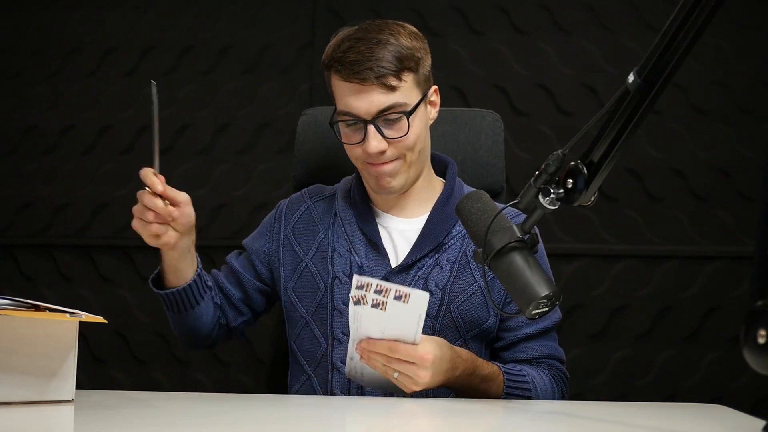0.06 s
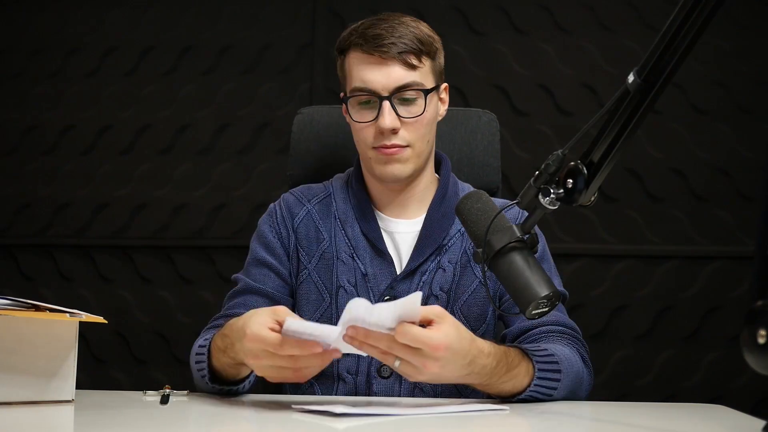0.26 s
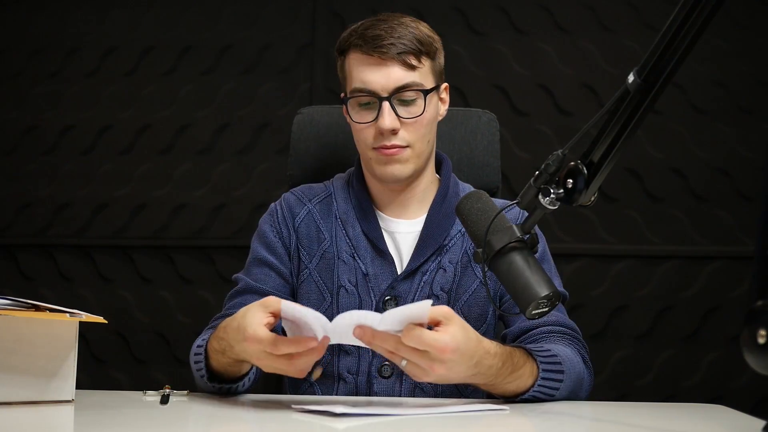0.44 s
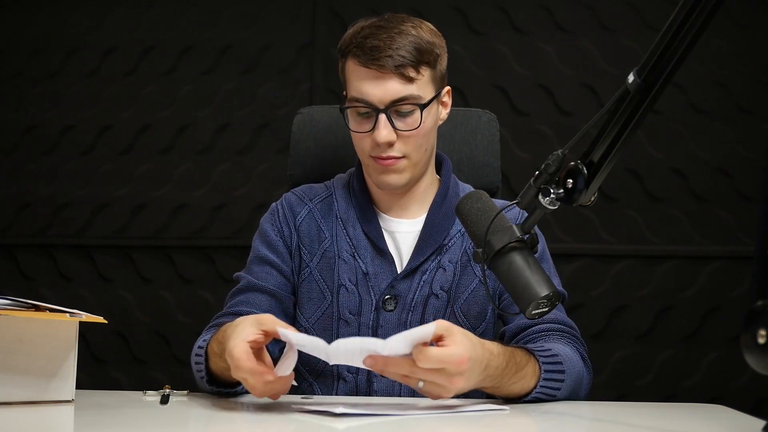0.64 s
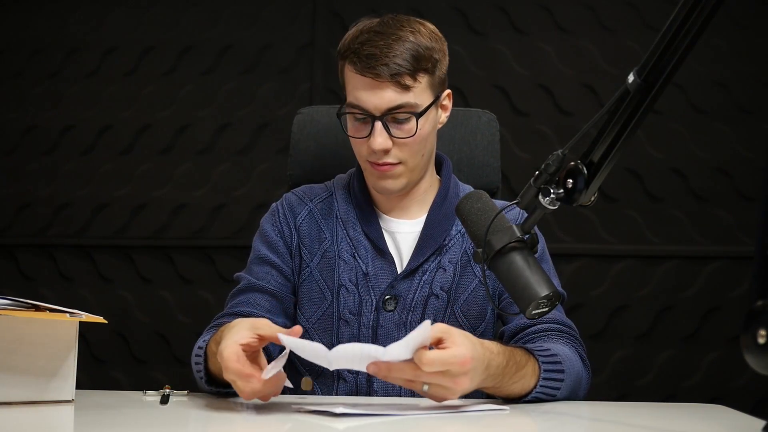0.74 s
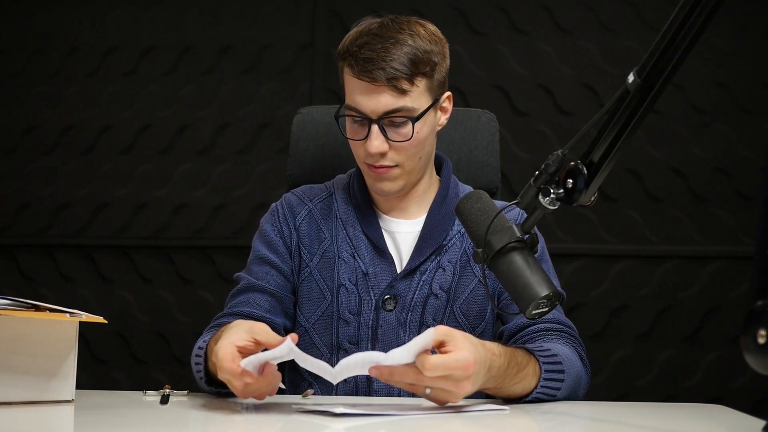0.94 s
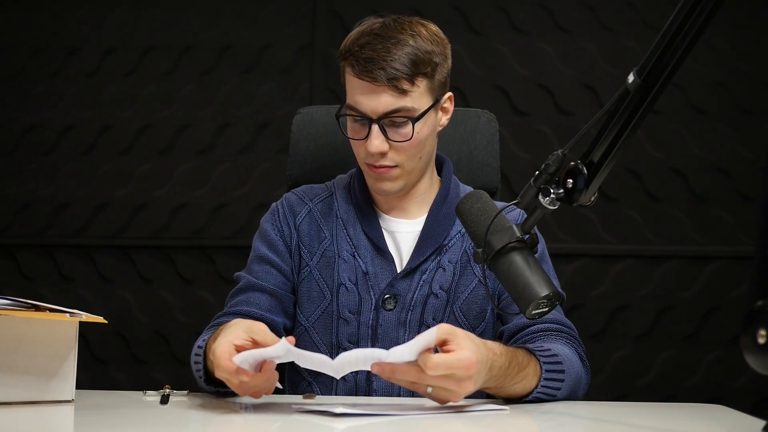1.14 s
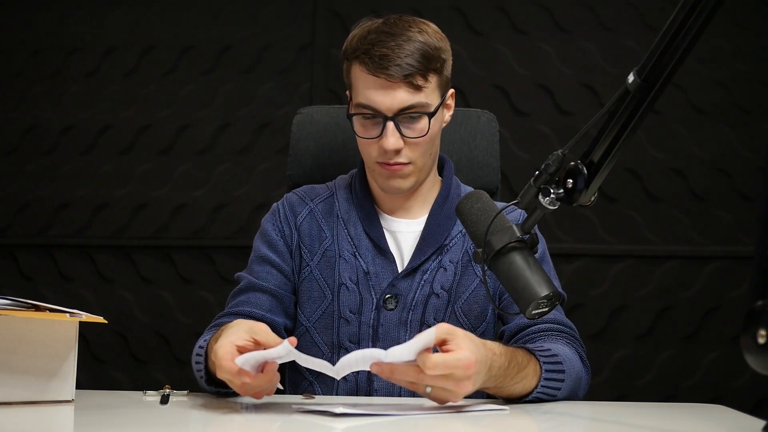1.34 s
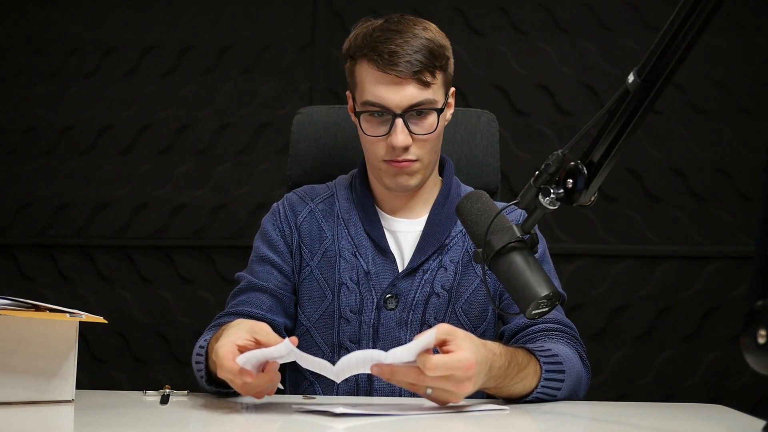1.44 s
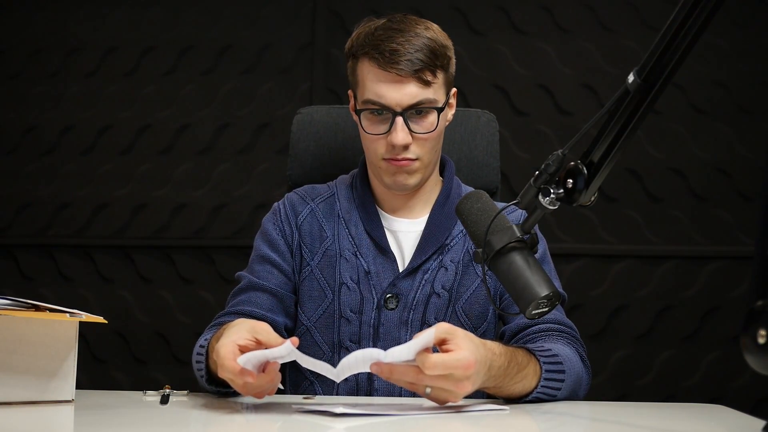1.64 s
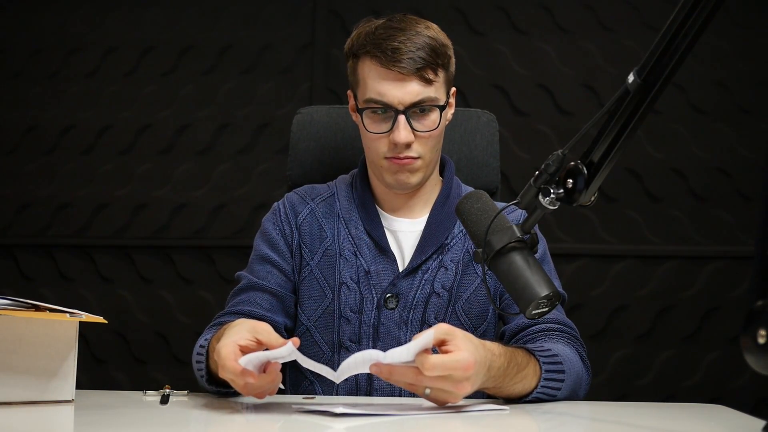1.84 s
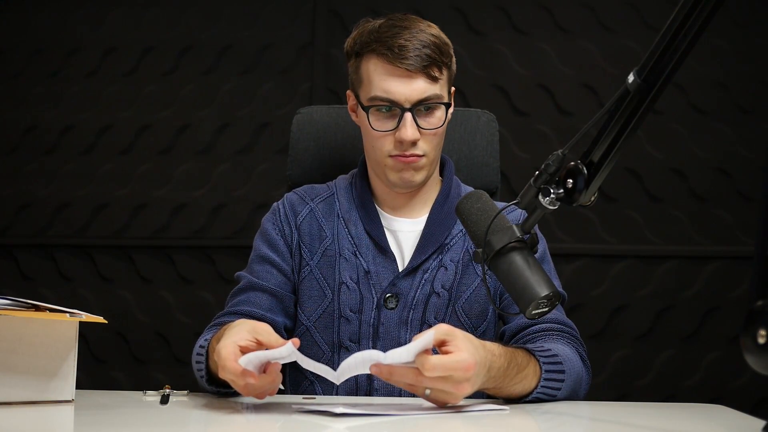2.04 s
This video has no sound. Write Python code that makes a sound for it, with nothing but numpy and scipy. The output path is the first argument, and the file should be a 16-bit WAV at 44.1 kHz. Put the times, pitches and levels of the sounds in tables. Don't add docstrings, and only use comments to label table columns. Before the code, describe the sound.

A small coin drops onto a hard desk. A knock dies away at the start over faint room air; low thumps, soft paper rustle and dull taps follow, strongest near 0.45 s. The coin hits at 0.57 s, bouncing with sharp ticks and thin high ringing until 1.0 s, rattles, then rolls quietly on its rim, wobbling faster to the end at about 2.1 s. Close microphone, small damped room.

```python
import sys
import numpy as np
from scipy import signal
from scipy.fft import rfft, irfft
from scipy.io import wavfile

SR = 44100
rng = np.random.default_rng(int(sys.argv[2]) if len(sys.argv) > 2 else 0)


def generate_wav(sig):
    pcm = np.round(np.clip(np.atleast_2d(sig).T, -1, 1) * 32767).astype(np.int16)
    wavfile.write(sys.argv[1], SR, pcm)


def level_to_linear(level):
    exponent = np.asarray(level, float) / 20
    return 10 ** exponent


N = 92080


def level(x, db):
    return x * level_to_linear(db) / np.sqrt(np.mean(x ** 2))


def band(x, hz, width_hz):
    return signal.lfilter(*signal.iirpeak(min(hz, .45 * SR), hz / width_hz, fs=SR), x)


def low(x, hz):
    return signal.lfilter(*signal.butter(2, min(hz, .45 * SR), fs=SR), x)


def colour(points):
    hz, db = np.array(points).T
    f = np.fft.rfftfreq(N, 1 / SR) + 1
    gain = level_to_linear(np.interp(np.log(f), np.log(hz), db))
    return level(irfft(rfft(rng.standard_normal(N)) * gain, N), 0)


def spikes(times, sizes):
    x = np.zeros(N)
    np.add.at(x, np.clip((np.asarray(times) * SR).astype(int), 0, N - 1), sizes)
    return x


def through(x, response):
    return signal.fftconvolve(x, response)[:N]


def burst(hz, width_hz, t60, grit=0.27):
    u = np.arange(400) / SR
    x = grit * rng.standard_normal(400) * level_to_linear(-60 * u / t60)
    x[0] = -2
    x = low(band(x, hz, width_hz), hz + width_hz)
    return x / np.abs(x).max()


# f/Hz, level/dB, t60/s
ROOM_BANDS = [(250, -12.5, 0.23), (470, -8, 0.17), (1120, -4.5, 0.19), (1710, 0.5, 0.2), (4000, 3.5, 0.13),
              (7100, -25, 0.043), (11000, -24, 0.11), (15500, -15, 0.13)]
# f/Hz, width/Hz, level/dB
DESK_MODES = [(540, 60, -9), (830, 60, -19), (1140, 95, -1), (1440, 80, -3), (1710, 80, -5),
              (1930, 100, -1), (2420, 100, -4), (2950, 110, -6), (6500, 300, -5)]


def room():
    DESK_DB, DESK_T60_S, RISE_S = -8, 0.25, 0.00033
    t = np.arange(SR // 2) / SR
    out = np.zeros(len(t))
    for hz, db, t60 in ROOM_BANDS:
        noise = band(band(rng.standard_normal(len(t)), hz, 1.01 * hz), hz, 1.12 * hz)
        out += level_to_linear(db - 60 * t / t60) * level(noise, 0)
    desk, noise = np.zeros(len(t)), rng.standard_normal(len(t))
    for hz, width, db in DESK_MODES:
        mode = 2 * np.sin(2 * np.pi * hz * t) * np.exp(-t * width / 2)
        desk += level_to_linear(db) * (level(band(noise, hz, width), 0) + mode)
    out = (out + level_to_linear(DESK_DB - 60 * t / DESK_T60_S) * desk) * (1 - np.exp(-t / RISE_S))
    return out / np.sqrt(np.sum(out ** 2))


# f/Hz, level/dB per Hz
AIR_SPECTRUM = [(15, -7.5), (28, -9), (70, -23.5), (120, -15), (200, -28), (500, -27.5), (1500, -33.5),
                (16000, -54)]


def air():
    return level_to_linear(-66.5) * colour(AIR_SPECTRUM)


def knock(t):
    LEVEL_DB, TOP_HZ, T60_S = -35, 1600, 0.16
    dull = low(rng.standard_normal(N), TOP_HZ)
    bright = low(rng.standard_normal(N), 6700)
    return level_to_linear(LEVEL_DB - 60 * t / T60_S) * level(dull + 0.55 * bright, 0)


# t/s, level/dB, f/Hz, t60/s
THUMP_SWINGS = [(0, -27.5, 53.5, 0.07), (.002, -44, 139.3, 0.12), (.275, -45, 39.4, 0.23),
                (0.346, -51.5, 62, 0.29), (0.446, -36.5, 103, 0.072), (.49, -49.5, 45.4, 0.31),
                (0.596, -41.5, 45, 0.29), (0.758, -37.5, 47.2, 0.24), (0.766, -59.5, 120.4, 0.6),
                (0.895, -47, 47.8, 0.23), (0.98, -52, 46, 0.2), (1.11, -57.5, 47.7, .2),
                (1.141, -71.5, 122.3, 0.97)]


def thumps(t):
    out = np.zeros(N)
    for s, db, hz, t60 in THUMP_SWINGS:
        u = np.clip(t - s, 0, None)
        rise = 1 - np.exp(-u * hz)
        out -= level_to_linear(db - 60 * u / t60) * rise * 2 * np.sin(2 * np.pi * hz * u)
    return out


# t/s, level/dB, f/Hz, t60/s
PANEL_MODES = [(0, -38, 446, .11), (0, -37, 1093, 0.07), (0, -33, 1297, 0.042), (0, -57, 1030, 0.069),
               (.171, -53, 462, 0.092), (0.236, -44.5, 1040, 0.031), (.237, -53, 330, 0.033),
               (.2762, -46, 818, 0.13), (0.2754, -41.5, 1140, .12), (0.2775, -43.5, 1284, 0.15),
               (0.277, -48, 1385, 0.16), (.445, -37, 407, .06), (.853, -39, 1000, 0.084),
               (.19, -54.5, 1060, 0.027), (.237, -45.5, 2210, 0.015), (.237, -40, 4620, 0.013),
               (.341, -53, 2530, 0.032), (.445, -37.5, 841, 0.19), (0.443, -35.5, 1152, 0.15),
               (.445, -33, 1477, 0.083), (0.444, -55, 1960, 0.064), (.5756, -53, 580, 0.12),
               (.5756, -36, 1867, 0.11), (0.5754, -45, 1192, 0.099), (0.7437, -30, 1146, 0.071),
               (0.744, -46.5, 1510, 0.13), (.7436, -39, 2430, 0.14), (0.8866, -39, 1080, 0.1),
               (0.8866, -49, 2040, 0.095)]


def panel_modes(t):
    RISE_S, ROUGH_DB, ROUGH_HZ = 0.00067, 3, 107
    out = np.zeros(N)
    for s, db, hz, t60 in PANEL_MODES:
        u = np.clip(t - s, 0, None)
        rough = ROUGH_DB * level(low(rng.standard_normal(N), ROUGH_HZ), 0)
        out -= level_to_linear(db + rough - 60 * u / t60) * (1 - np.exp(-u / RISE_S)) * np.sin(2 * np.pi * hz * u)
    return out


# t/s, level/dB
RUSTLE_LEVEL = [
    (.13, -82),
    (.17, -69),
    (.22, -68.5),
    (.3, -60.5),
    (.4, -56.5),
    (0.429, -51),
    (.5, -56),
    (.56, -67.5),
    (.75, -85),
]


def rustle(t):
    grain = level_to_linear(2.9 * level(low(rng.standard_normal(N), 79), 0))
    paper = level(grain * band(rng.standard_normal(N), 840, 5000), 0)
    return low(paper * level_to_linear(np.interp(t, *np.array(RUSTLE_LEVEL).T, left=-120, right=-120)), 8000)


# t/s, level/dB, f/Hz, body level/dB
PAPER_TAPS = [(0.171, -45.5, 457, -4), (.237, -36.5, 2410, -17), (0.2435, -60, 2520, 5),
              (0.276, -31, 1100, -4.5), (0.282, -35.5, 1190, -28), (0.2906, -42.5, 1210, -12),
              (0.322, -46.5, 4900, -11), (0.3426, -48, 2370, -4), (0.422, -37, 4000, -7),
              (0.4394, -37, 825, -2), (0.443, -33, 3840, -12), (0.4451, -22, 1600, -7),
              (0.4489, -23.5, 4000, -4.5), (0.4521, -26, 3600, -8), (0.454, -24, 1150, -11.5),
              (0.4627, -39, 3070, -16), (0.473, -36, 5100, 7), (0.4966, -44, 1160, 9)]


def taps(answer):
    T60_S, ROOM_DB, ROOM_TOP_HZ = 0.0092, 13, 4230
    out = np.zeros(N)
    for s, db, hz, body_db in PAPER_TAPS:
        kick = spikes([s], [level_to_linear(db)])
        snap = burst(hz, 0.79 * hz, T60_S, grit=0.33) + 0.59 * burst(3640, 4100, 0.017, grit=0.36)
        body = low(answer, ROOM_TOP_HZ) + band(answer, hz, hz / 2)
        out += through(kick, snap) + level_to_linear(ROOM_DB + body_db) * through(kick, body)
    return out


# t/s, level/dB
ARM_SWAY = [
    (.26, -82),
    (.29, -48.5),
    (.55, -49),
    (.72, -44.5),
    (.86, -49.5),
    (1.05, -48.5),
    (1.22, -57.5),
    (1.5, -64),
    (2.09, -57.5),
]


def sway(t):
    SWAY_HZ, PEAK_S = 13.1, 1
    gain = level_to_linear(np.interp(t, *np.array(ARM_SWAY).T, left=-120))
    return gain * np.cos(2 * np.pi * SWAY_HZ * (t - PEAK_S))


def ticks(times, sizes, bright):
    ECHO_S, ECHO_DB, SPIKE = .0071, -3.5, 0.34
    out, lag = np.zeros(N + 800), int(ECHO_S * SR)
    for s, size, share in zip(times, sizes, np.clip(bright, 0, 1)):
        i = int(s * SR)
        sharp = share * (burst(11400, 4800, 0.0074, grit=1.0) + 0.34 * burst(9600, 5300, 0.0024))
        contact = SPIKE * low(burst(7600, 9500, .001, grit=0.045), 8000 + 14000 * share)
        dull = (1 - share) * (burst(6230, 2200, 0.013) + .5 * burst(2500, 3100, 0.015))
        out[i:i + 400] += size * (sharp + contact + dull)
        out[i + lag:i + lag + 400] += size * level_to_linear(ECHO_DB) * sharp
    return out[:N]


# t/s, level/dB, brightness/0-1, body level/dB
COIN_BOUNCES = [(0.5716, -18.5, 0.22, 3), (.5756, -18.5, 0.66, 2), (0.5788, -18, 0.08, -1.5),
                (0.5858, -36, 0.2, -6.5), (0.665, -34, 0, 5.5), (0.693, -45.5, 0.1, 8.5),
                (0.7408, -26, 0.63, 2.5), (0.7436, -29.5, 0.58, 8), (0.7444, -17, 0.48, -7.5),
                (0.7594, -34, 0.9, -4), (0.8246, -34, 0.35, 4), (0.8258, -22.5, 0, -2),
                (0.827, -38, 0.2, 8), (0.8525, -30.5, 0.01, 5.5), (.8816, -20, 0.26, -12.5),
                (.884, -23.5, 1, -0.5), (0.8865, -21.5, 0.12, 2.5), (.976, -25, 0.01, 3.5),
                (0.987, -21.5, 0.62, -2.5), (1.004, -35, 1, 1)]
# t/s, level/dB, brightness/0-1
COIN_RATTLES = [(1.039, -28, 0), (1.0712, -29.5, 0.3), (1.0735, -34, 0.9), (1.0842, -30, 0),
                (1.0948, -36.5, 1), (1.1079, -33.5, 0.46), (1.1268, -33.5, 0.68), (1.1378, -57, .2),
                (1.1402, -53, 0.8), (1.1514, -44, .2), (1.1572, -34, 0), (1.162, -35, 0.07),
                (1.1686, -37.5, 0.85), (1.1739, -39, 0.7), (1.1816, -40, 0.8), (1.195, -43, 0.3),
                (1.2068, -54, 0), (1.2171, -38.5, 0.13), (1.2259, -35.5, 0.6), (1.2351, -43, 0.7),
                (1.263, -40, 0.5), (1.286, -63, 0.7), (1.2916, -48, 0.9), (1.304, -42, 0.7),
                (1.36, -44, 0.6), (1.3644, -58, 0.2), (1.4203, -61, .2), (1.4592, -49, 0.2),
                (1.4737, -53, .3), (1.4916, -50, 0.7), (1.5445, -35.5, 0.37), (1.6064, -44, 0.2),
                (1.6987, -56, 0.2), (1.7655, -46, 0.4), (1.7705, -44, .6), (1.9716, -59, 0.4),
                (2.007, -58, 0.4), (2.0394, -56, 0.7)]


def coin(answer):
    ROOM_DB, TREBLE_GAIN, SPLIT_HZ = -1, 2.53, 4900
    b_s, b_db, b_bright, body_db = np.array(COIN_BOUNCES).T
    r_s, r_db, r_bright = np.array(COIN_RATTLES).T
    times = np.r_[b_s, r_s]
    sizes = level_to_linear(np.r_[b_db + body_db + 11, r_db + 9])
    bright = np.clip(np.r_[b_bright, r_bright], 0, 1)
    body = low(answer, SPLIT_HZ)
    tail = through(spikes(times, sizes), body)
    tail += TREBLE_GAIN * through(spikes(times, sizes * bright), answer - body)
    return ticks(b_s, level_to_linear(b_db), b_bright) + ticks(r_s, level_to_linear(r_db), r_bright) + level_to_linear(ROOM_DB) * tail


# t/s, low tone level/dB, high tone level/dB, sag/Hz per s, tumbling/turns per s
COIN_FLIGHTS = [
    (0.577, -43.5, -48.5, 150, 26),
    (0.741, -52, -52.5, 60, 24),
    (0.825, -55, -50, 100, 30),
    (0.881, -45.5, -43, 171, 9.8),
    (0.977, -46.5, -46, 450, 6.8),
    (1.069, -50.5, -57, 244, 12),
    (1.2, -53, -61, 302, 14.7),
]


def ring(t):
    TONES_HZ, T60_S, RISE_S, STOP_S, TUMBLE_DEPTH = (9772, 9835), 0.91, 0.014, 0.0018, 0.4
    drift = np.cumsum(level(low(rng.standard_normal(N), 25), 0)) * 6 / SR
    out = np.zeros(N)
    ends = [flight[0] for flight in COIN_FLIGHTS[1:]] + [t[-1] + 1]
    for (s, low_db, high_db, sag, tumble), end in zip(COIN_FLIGHTS, ends):
        u = np.clip(t - s, 0, None)
        shape = (1 - np.exp(-u / RISE_S)) * level_to_linear(-60 * u / T60_S)
        shape = shape * np.exp(-np.clip(t - end, 0, None) / STOP_S)
        for hz, db, phase, side in zip(TONES_HZ, (low_db, high_db), rng.random(2), (-1, 1)):
            throb = 1 + side * TUMBLE_DEPTH * np.cos(2 * np.pi * tumble * u)
            cycles = hz * u - sag * u ** 2 / 2 + phase + drift
            out += shape * throb * level_to_linear(db) * np.sin(2 * np.pi * cycles)
    return out


# t/s, wobble rate/Hz, level/dB, swell depth/dB, tick level/dB
RIM_WOBBLE = [
    (1.028, 10.4, -59.5, 18, -9),
    (1.2, 15.7, -56.5, -1.5, -1.5),
    (1.299, 13.2, -62, 9.5, -69),
    (1.473, 16.5, -57, 3, -4),
    (1.62, 17.7, -59, 4, -23.5),
    (1.78, 21.96, -56, 2, -3.5),
    (1.9, 24.5, -58.5, 3, -7),
    (2.09, 29.4, -57, 2.5, -6),
]
# f/Hz, level/dB per Hz
ROLL_SPECTRUM = [(250, -58), (530, -10), (680, -14.5), (1120, -9), (1940, -7.5), (6500, -9), (9200, -22),
                 (16000, -31)]


def wobble(t, answer):
    PEAK_S, FADE_IN_S, TICKS_PER_S = 1.5, 0.06, 155
    RING_DB, RING_HZ, RING_WIDTH_HZ = 10, (9770, 9880), 84
    knots = np.array(RIM_WOBBLE).T
    start = knots[0, 0]
    rate, db, depth, tick_db = (np.interp(t, knots[0], column) for column in knots[1:])
    turn = np.cumsum(rate) / SR
    swell = np.cos(2 * np.pi * (turn - np.interp(PEAK_S, t, turn)))
    gain = level_to_linear(db + depth * swell) * np.clip((t - start) / FADE_IN_S, 0, 1)

    noise = colour(ROLL_SPECTRUM)
    desk = sum(level_to_linear(d) * level(band(noise, hz, 0.82 * width), 0) for hz, width, d in DESK_MODES)
    hiss = level(noise + level_to_linear(-14.5) * desk, 0) * gain
    hiss = through(hiss, np.r_[1, .4 * answer[:4000]])

    spacing, spread = rng.standard_normal((2, 400))
    times = start + np.cumsum(1 + 0.081 * spacing) / TICKS_PER_S
    at = np.clip((times * SR).astype(int), 0, N - 1)
    sizes = (times < t[-1]) * gain[at] * level_to_linear(tick_db[at] + 17 + 3 * spread)
    grit = spikes(times, -sizes)
    click = burst(7000, 2800, 0.0015, grit=0.069) + burst(10140, 1250, 0.0034, grit=0.046)

    sing = sum(band(3 * grit + gain * rng.standard_normal(N), hz, RING_WIDTH_HZ) for hz in RING_HZ)
    scrape = gain * level_to_linear(tick_db + 4) * band(rng.standard_normal(N), 11700, 1200)
    return hiss + through(grit, click) + level_to_linear(RING_DB) * sing + scrape


def scene():
    t, answer = np.arange(N) / SR, room()
    hands = knock(t) + rustle(t) + taps(answer)
    desk = thumps(t) + panel_modes(t) + sway(t)
    money = coin(answer) + ring(t) + wobble(t, answer)
    return (air() + hands + desk + money)[None]


def low_pass(x):
    return signal.sosfilt(signal.butter(12, 16800, fs=SR, output="sos"), x)


def record(dry):
    mix = signal.sosfilt(signal.ellip(6, .5, 28, 15900, fs=SR, output="sos"), dry)
    return low_pass(mix)


dry = scene()
out = record(dry)
generate_wav(out)
```